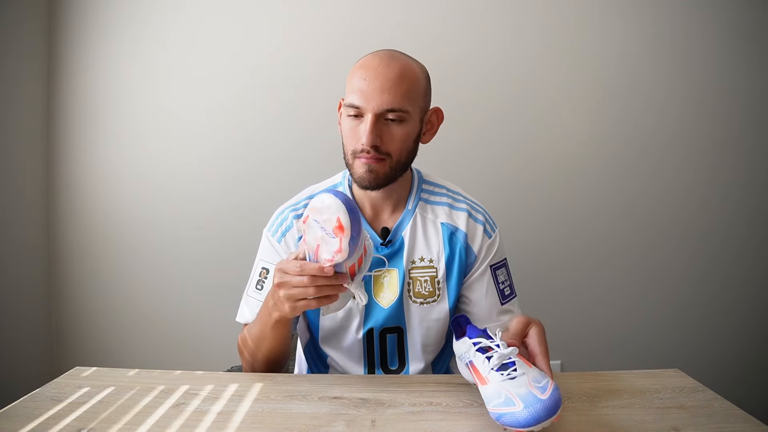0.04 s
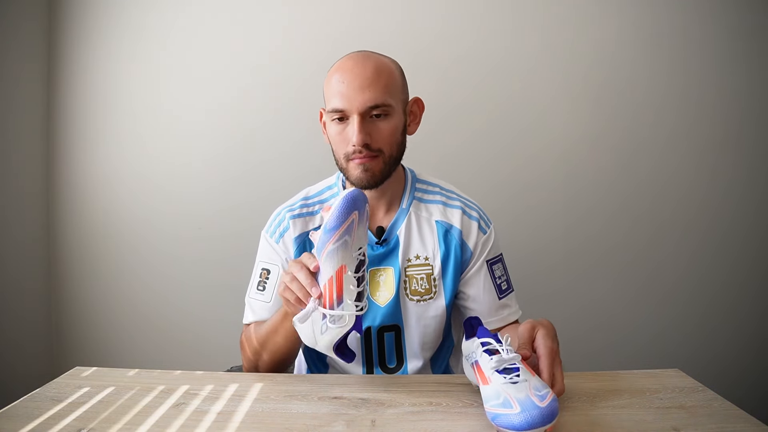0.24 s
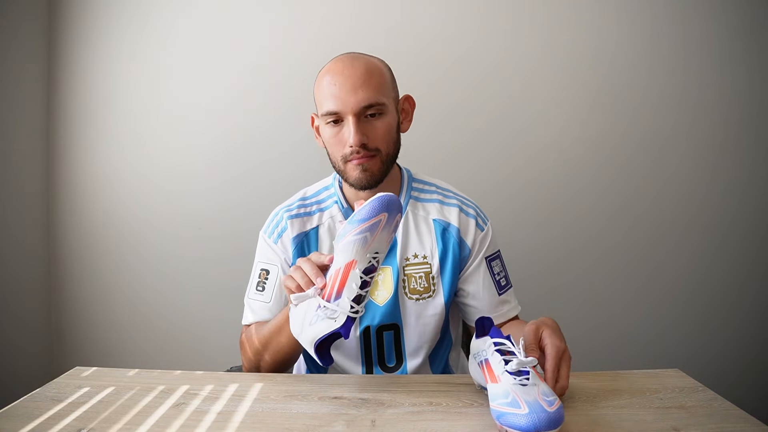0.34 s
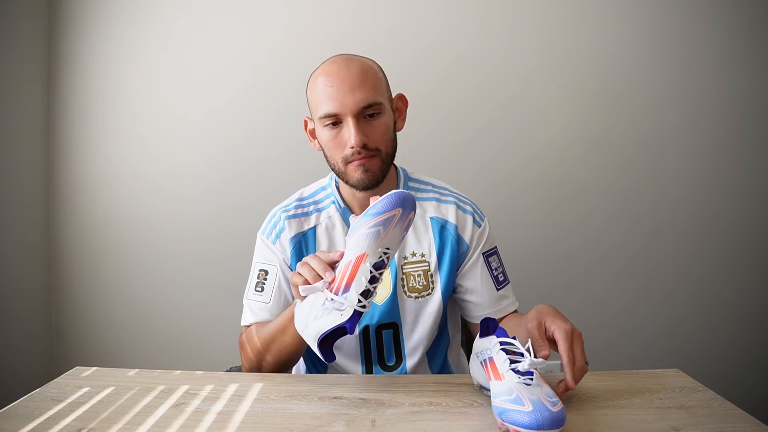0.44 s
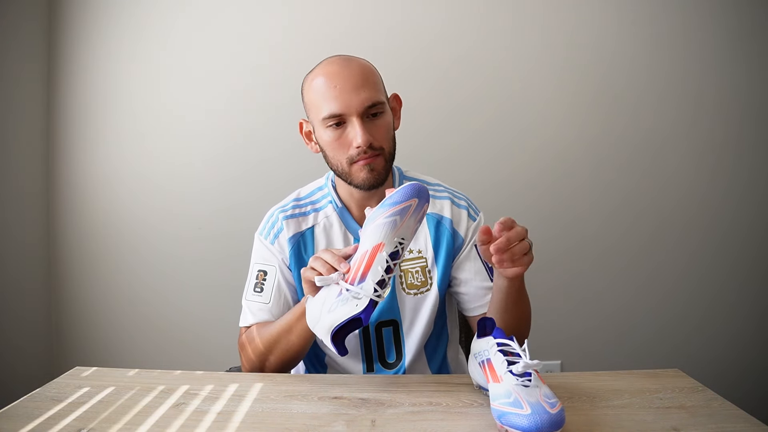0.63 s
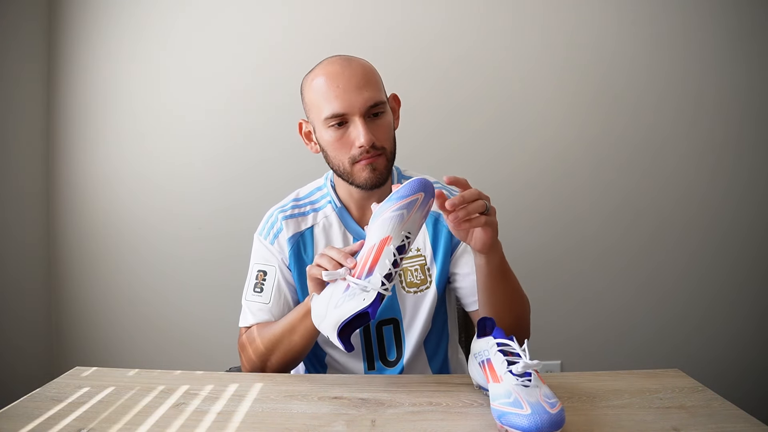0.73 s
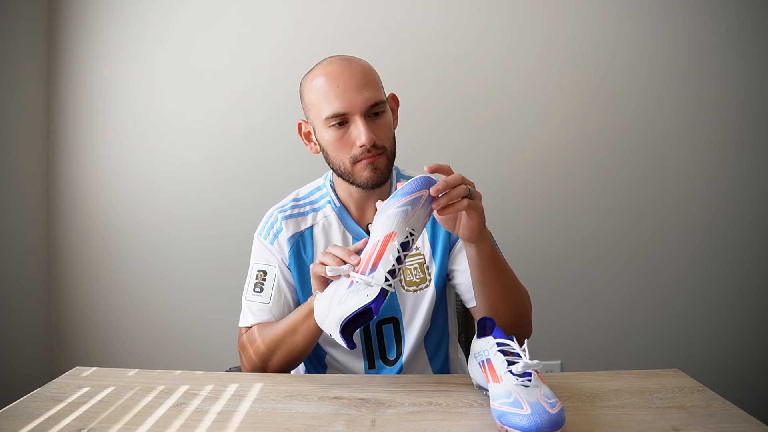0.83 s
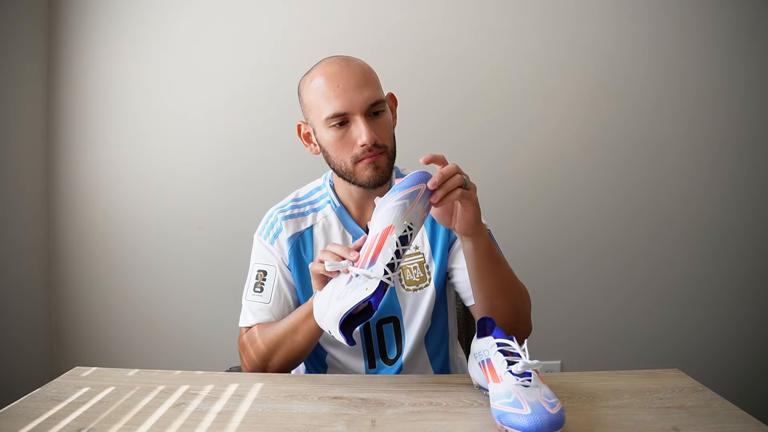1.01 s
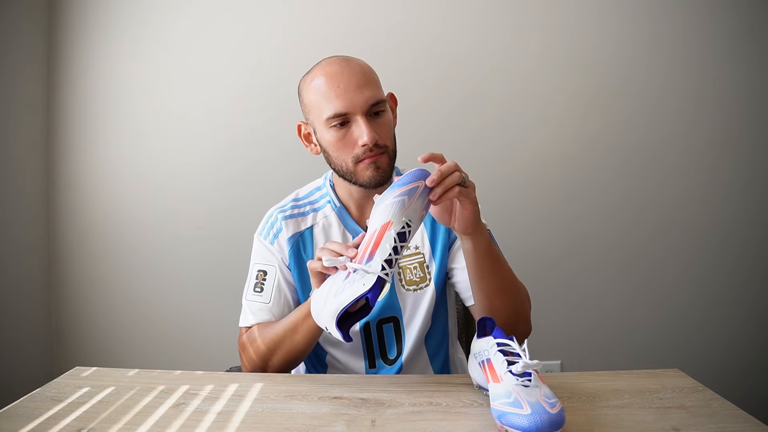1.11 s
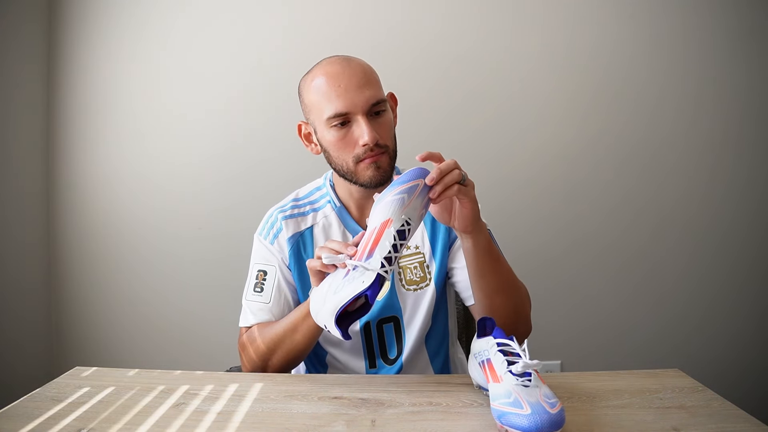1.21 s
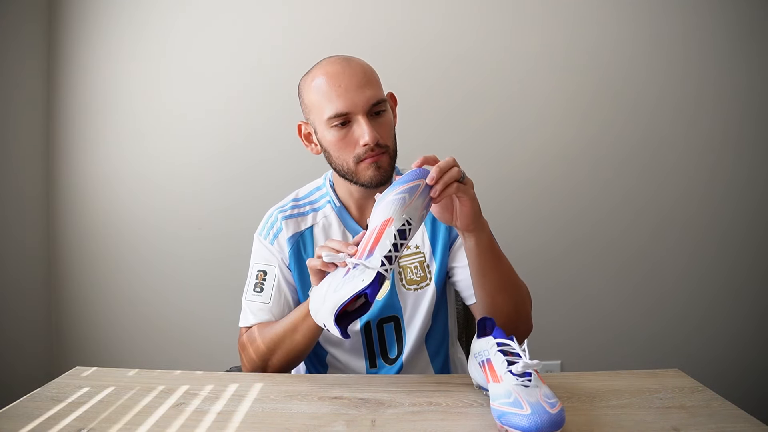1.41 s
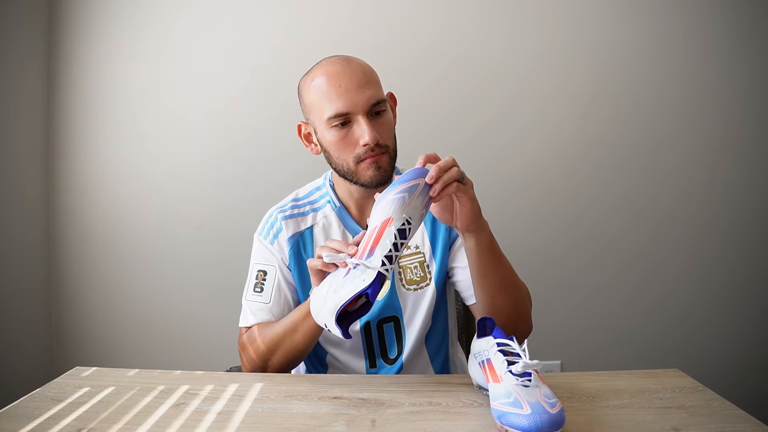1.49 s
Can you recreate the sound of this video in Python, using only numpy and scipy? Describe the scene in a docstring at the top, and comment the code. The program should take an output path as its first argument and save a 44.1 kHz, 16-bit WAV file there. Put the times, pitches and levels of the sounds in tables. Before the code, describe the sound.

Hard boot studs clatter onto a wooden tabletop, followed by faint handling and light taps

```python
"""A studded football boot is set down on a wooden table in a small bare room, close to the microphone.
Over faint room noise (filtered noise), hands brush (noise of varying level) and tap a second boot
(damped modes), and the walls answer (convolution). A plastic tick follows (plate modes and a noise burst),
then the studs knock, rock and settle (clicks, sharp blows, damped thumps) while the table top rings
(long modes). The loudest knocks clip softly; brushing and light taps go on to the end."""
import sys
import numpy as np
from scipy import signal
from scipy.fft import rfft, irfft
from scipy.io import wavfile

SR = 44100
rng = np.random.default_rng(int(sys.argv[2]) if len(sys.argv) > 2 else 0)


def persist_wave(psi):
    """Save psi, clipped to +-1, as 16-bit WAV."""
    counts = np.round(np.clip(psi, -1, 1) * 32767).astype(np.int16)
    wavfile.write(sys.argv[1], SR, np.atleast_2d(counts).T)


N = 68355  # length in samples
TIME_S = np.arange(N) / SR
FREQS_HZ = np.fft.rfftfreq(N, 1 / SR)
CONTACT_S = 0.00011  # opening time constant of the hardest contacts


def undb(db):
    """Logarithmic level: decibels to amplitude gain."""
    return 10 ** (np.asarray(db) / 20)


def unit(x):
    """Normalisation: scale to rms 1."""
    return x / np.sqrt(np.mean(x ** 2))


def across(hz, table, axis=1):
    """Logarithmic pitch: interpolate a table column on a log-frequency axis."""
    table = np.array(table, float)
    return np.interp(np.log(np.maximum(hz, 1)), np.log(table[:, 0]), table[:, axis])


def decay(t60):
    """Exponential damping: lose 60 dB in t60 seconds."""
    return np.exp(-np.log(1000) * np.minimum(TIME_S / t60, 10))


def rise(seconds):
    """First-order build-up: open with the given time constant."""
    return 1 - np.exp(-TIME_S / seconds)


def ring(hz, t60):
    """Free vibration: one struck mode is a damped sine."""
    return np.sin(2 * np.pi * hz * TIME_S) * decay(t60)


def noise(colour):
    """Spectral shaping: steady random noise of a given colour, rms 1."""
    white = rfft(rng.standard_normal(N))
    return unit(irfft(white * undb(across(FREQS_HZ, colour)), N))


def burst(colour, t60):
    """High modal density: a crowd of quickly damped modes fills a colour evenly, with a set energy."""
    envelope = decay(t60)
    # The phases of decaying noise keep the sound short; the magnitudes come from the colour.
    phase = np.angle(rfft(rng.standard_normal(N) * envelope))
    crack = irfft(undb(across(FREQS_HZ, colour)) * np.exp(1j * phase), N)
    return unit(crack * decay(10 * t60) * rise(CONTACT_S)) * np.sqrt(np.mean(envelope ** 2) / 2)


def pulse(colour, pitch):
    """Minimum phase: one sharp blow through a broad, heavily damped resonance; peak 1."""
    log_spectrum = np.log(undb(across(FREQS_HZ / pitch, colour)))
    cepstrum = irfft(log_spectrum, N)
    # Folding the cepstrum onto positive times packs the energy at the start.
    causal = np.sign(N / 2 - np.arange(N)) + 1
    blow = irfft(np.exp(rfft(cepstrum * causal)), N)
    return blow / np.abs(blow).max()


def add(out, start, sound):
    """Superposition: mix a sound in at a time in seconds."""
    i = int(max(start, 0) * SR)
    out[i:] += sound[:N - i]


# colour of the still air: f/Hz, relative level/dB
AIR_COLOUR = [(15, -46), (25, -13), (74, -9), (108, -12), (145, -8), (242, -7), (309, -11), (591, -14),
              (818, -19.5), (1020, -16), (1330, -19), (1790, -21), (16000, -33)]
AIR_DB = -57


def still_air():
    """Stationary random noise: the faint background of the room."""
    return undb(AIR_DB) * noise(AIR_COLOUR)


# colour of skin and cloth rubbing: f/Hz, relative level/dB
RUB_COLOUR = [(100, -13), (300, -6), (450, 2.5), (850, -2.5), (1200, -10), (2200, -12), (3400, -15.5),
              (4500, -17.5), (6000, -27.5), (9000, -30.5), (16000, -37.5)]
# level of the brushing hands and sleeves: t/s, level/dB
BRUSH_LEVEL = [(0, -50.5), (.08, -46.5), (.2, -45.5), (.38, -44), (.46, -42), (.7, -50), (.86, -57),
               (1.03, -58.5), (1.2, -67), (1.42, -70), (1.55, -56)]
# colour of a soft narrow hiss: f/Hz, relative level/dB
HISS_COLOUR = [(1000, -18), (2200, -4), (3600, -5.5), (4500, -1.5), (5300, -12), (7000, -19.5),
               (16000, -26)]
# level of the hiss: t/s, level/dB
HISS_SWELL = [(0, -70), (.35, -56.5), (.7, -67.5), (.9, -64), (1.04, -60.5), (1.17, -68), (1.3, -76)]


def brushing():
    """Friction noise: skin and cloth slide over the boot; a soft hiss swells and fades."""
    out = np.zeros(N)
    for colour, level in [(RUB_COLOUR, BRUSH_LEVEL), (HISS_COLOUR, HISS_SWELL)]:
        times, level_db = np.array(level).T
        out += noise(colour) * undb(np.interp(TIME_S, times, level_db))
    return out


# fingers and light touches on the boots: t/s, level/dB, f/Hz
TOUCHES = [(0.024, -36.5, 530), (0.059, -47, 790), (0.125, -30, 394), (0.387, -30.5, 870),
           (0.909, -33, 532), (0.9125, -41.5, 900), (0.952, -39.5, 520), (1.056, -40, 525),
           (1.492, -39.5, 520), (1.533, -33, 434), (1.541, -37.5, 910)]
# resonance of the struck sole, which the clacks shift in pitch: f/Hz, relative level/dB
SOLE_COLOUR = [(150, -31), (700, 3), (1100, -2.5), (1600, 9), (2150, 2), (2700, -5), (3600, -17),
               (5000, -53), (9000, -34), (16000, -55)]
TAP_T60_S, TAP_CLACK_DB = 0.031, -12
SOFT_RISE_S = 0.00059  # opening time constant shared by taps and thumps


def taps():
    """Damped resonance: soft hollow touches each excite one mode and a little of the sole."""
    out = np.zeros(N)
    for start, db, hz in TOUCHES:
        touch = ring(hz, TAP_T60_S) + undb(TAP_CLACK_DB) * burst(SOLE_COLOUR, TAP_T60_S)
        add(out, start, undb(db) * touch * rise(SOFT_RISE_S))
    return out


# the room's answer: f/Hz, relative level/dB, decay time t60/s
ROOM_MODES = [(64.6, 9, 0.39), (134, 1.5, 0.33), (250, 1, 0.38), (594, -5, 0.24), (1080, -3, 0.3),
              (1850, -7, 0.32), (4060, -2.5, 0.16), (6900, -3.5, 0.11), (14000, -24, 0.14)]
WALL_DELAY_S, WALL_BUILD_S, ROOM_DB = 0.011, 0.0013, 2


def room(x):
    """Reverberation: dense wall echoes arrive after a short gap; the treble dies first."""
    white = rfft(rng.standard_normal(N))
    tail, response = np.zeros(N), np.zeros(N)
    for hz in 45 * 2 ** np.arange(0, 8.6, 1 / 3):  # third-octave bands
        band = np.abs(np.log2(np.maximum(FREQS_HZ, 1) / hz)) < 1 / 6
        t60 = across(hz, ROOM_MODES, axis=2)
        echoes = irfft(white * band, N) * decay(t60) * rise(WALL_BUILD_S)
        # Each band's energy follows its share of the spectrum.
        tail += unit(echoes) * np.sqrt(band.mean() / N) * undb(across(hz, ROOM_MODES))
    add(response, WALL_DELAY_S, tail)
    return undb(ROOM_DB) * signal.fftconvolve(x, response)[:N]


# hard plastic ticks of the sole: t/s, level/dB
SOLE_TICKS = [(0.1196, -17), (0.1249, -21)]
# modes of the sole plate: f/Hz, relative level/dB, decay time t60/s
SOLE_MODES = [(955, -8.5, 0.023), (1354, -17.5, 0.032), (2516, -13, 0.042), (3570, -18, 0.03),
              (4230, -26, 0.0047), (5250, -15, 0.0063)]
# colour of the snap: f/Hz, relative level/dB
SNAP_COLOUR = [(300, -28), (1200, 0), (4000, 5.5), (6000, -7.5), (8500, -19), (13000, -16.5), (16000, -21)]
SNAP_T60_S, SNAP_DB, TICK_LOW_HZ = 0.011, -1, 500


def ticks():
    """Plate vibration: the stiff plastic sole snaps and rings briefly in modes of alternating sign."""
    out, plate = np.zeros(N), np.zeros(N)
    for k, (hz, db, t60) in enumerate(SOLE_MODES):
        plate += (-1) ** k * undb(db) * ring(hz, t60)
    plate *= rise(CONTACT_S)
    for start, db in SOLE_TICKS:
        snap = undb(SNAP_DB) * burst(SNAP_COLOUR, SNAP_T60_S)
        add(out, start, undb(db) * (plate + snap))
    return signal.sosfilt(signal.butter(2, TICK_LOW_HZ, "high", fs=SR, output="sos"), out)


# studs landing on the table, heard as click, clack, thump and table ring:
# t/s, thump level/dB, thump f/Hz, clack level/dB, clack f/Hz, click level/dB, relative ring level/dB
LANDINGS = [(0.1989, 0.5, 580, -17, 2020, -29, -0.5), (0.2252, -2, 322, -14.5, 1530, -20, 3.5),
            (0.2638, -11.5, 250, -23.5, 1270, -64, -7), (0.4727, 3, 557, -3, 1667, -9.5, 5),
            (0.5938, 1.5, 546, -13.5, 1620, -46, -6.5), (0.6091, -15, 564, -36, 1630, -62, -10)]
# colour of a stud's click: f/Hz, relative level/dB
CLICK_COLOUR = [(300, -20), (1500, 20.5), (4000, 6), (6000, -29), (8000, -10), (12000, -15), (16000, -24)]
CLICK_T60_S = 0.0024


def stud_clicks():
    """Short contact, wide spectrum: the hard tip of a stud clicks at the instant of contact."""
    out = np.zeros(N)
    for start, *_, click_db, _ in LANDINGS:
        add(out, start, undb(click_db) * burst(CLICK_COLOUR, CLICK_T60_S))
    return out


TABLE_DB, TABLE_RISE_S = -31.5, 0.0068
# modes of the table: f/Hz before slight detuning, relative level/dB, decay time t60/s
TABLE_MODES = [(74.5, -10.5, 0.4), (124.95, -2, .58), (190.5, 2.5, 0.51), (238, 1, 0.42),
               (265.6, -2.5, 0.54), (272.7, 5, 0.36), (319, 1.5, 0.28), (387.5, 3, 0.35),
               (464.8, 4.5, 0.36), (553.4, 3.5, 0.57), (616, -8, 0.48), (803, -1.5, 0.2)]


def table_top():
    """Modal superposition: the table's low modes swell after each landing and ring on."""
    out = np.zeros(N)
    for start, *_, ring_db in LANDINGS:
        detune = 1 + 0.0023 * rng.standard_normal(len(TABLE_MODES))
        modes = np.zeros(N)
        for (hz, db, t60), ratio in zip(TABLE_MODES, detune):
            modes += undb(db) * ring(hz * ratio, t60)
        add(out, start, undb(TABLE_DB + ring_db) * modes * rise(TABLE_RISE_S))
    return out


CLACK_LAG_S, GRIT_DB, GRIT_T60_S = 0.0003, -5, 0.013
CLACK_HZ = 1655  # clack pitch at which the sole's colour stands unshifted


def clacks():
    """Impulse response: the hard sole answers each landing with a sharp blow and a short gritty ring."""
    out = np.zeros(N)
    for start, _, _, db, hz, *_ in LANDINGS:
        blow = pulse(SOLE_COLOUR, hz / CLACK_HZ)
        grit = undb(GRIT_DB) * burst(SOLE_COLOUR, GRIT_T60_S)
        add(out, start + CLACK_LAG_S, undb(db) * (blow + grit))
    return out


THUMP_LAG_S, THUMP_T60_S = 0.00071, 0.015
BODY_HZ, BODY_DB, BODY_T60_S = 275.2, -16, 0.05
RADIATION_HZ = 183.6  # little bass radiates below this


def thumps():
    """Radiation efficiency: each stud presses in with a damped wooden thump; little bass radiates."""
    out = np.zeros(N)
    for start, db, hz, *_ in LANDINGS:
        body = undb(BODY_DB) * ring(BODY_HZ, BODY_T60_S)
        thump = (ring(hz, THUMP_T60_S) + body) * rise(SOFT_RISE_S)
        add(out, start + THUMP_LAG_S, undb(db) * thump)
    return signal.sosfilt(signal.butter(2, RADIATION_HZ, "high", fs=SR, output="sos"), out)


def scene():
    """Direct and reverberant fields: hits with their shares of the room, table ring, brushing, still air."""
    # each hit with the level it sends to the room, in dB
    hits = [(thumps(), 0), (clacks(), -3.5), (stud_clicks(), -5.5), (ticks(), -7.5), (taps(), -4.5)]
    direct = sum(sound for sound, _ in hits)
    walls = room(sum(undb(room_db) * sound for sound, room_db in hits))
    return (direct + walls + table_top() + brushing() + still_air())[None]


CEILING, KNEE = 0.527, 4.7  # clipping amplitude; a higher knee bends more sharply
LOW_CUT_HZ, TOP_HZ = 37, 16000


def record(dry):
    """Saturation and band limiting: soft clipping flattens peaks, then the deepest bass and the top are cut."""
    clipped = dry / (1 + np.abs(dry / CEILING) ** KNEE) ** (1 / KNEE)
    thinned = signal.sosfilt(signal.butter(1, LOW_CUT_HZ, "high", fs=SR, output="sos"), clipped)
    return signal.sosfilt(signal.ellip(10, .2, 80, TOP_HZ, fs=SR, output="sos"), thinned)


dry = scene()
out = record(dry)
persist_wave(out)
```